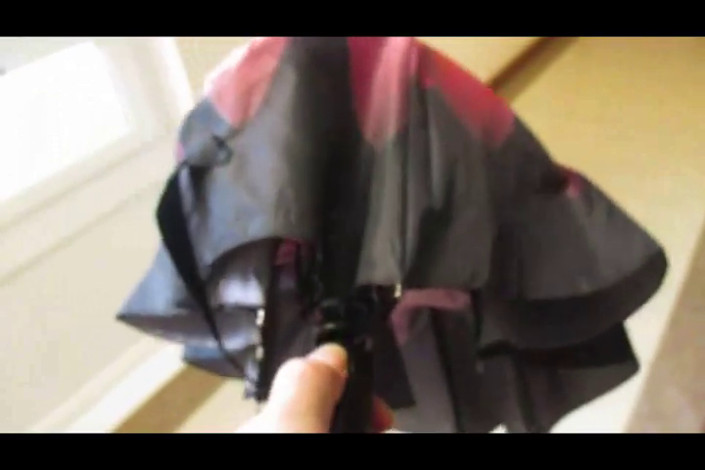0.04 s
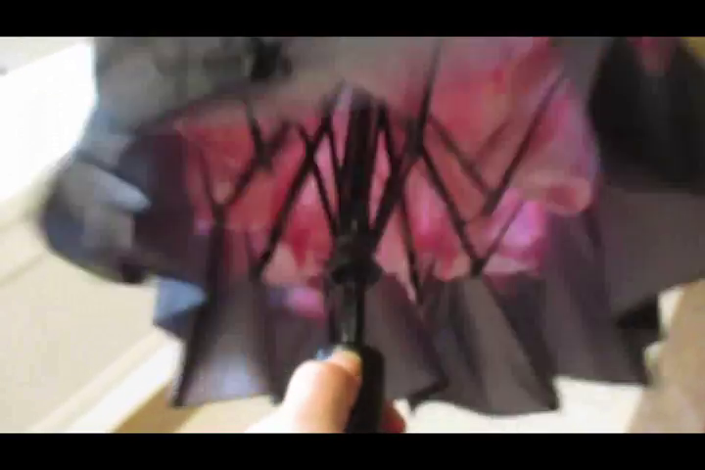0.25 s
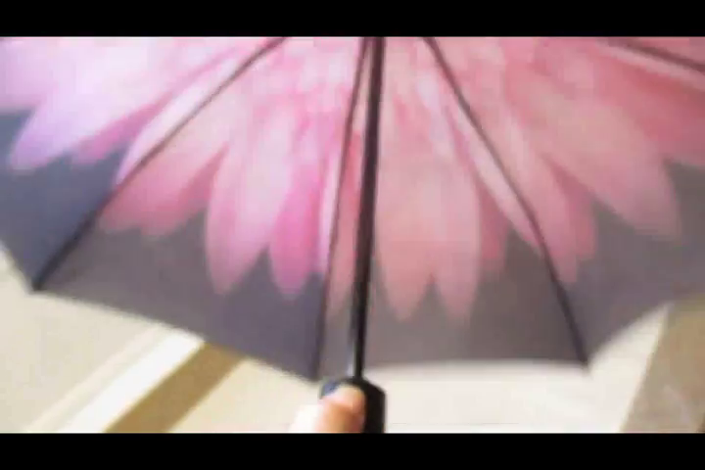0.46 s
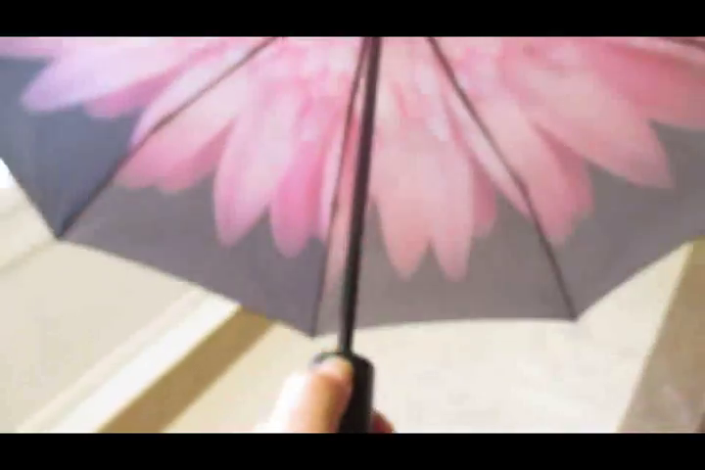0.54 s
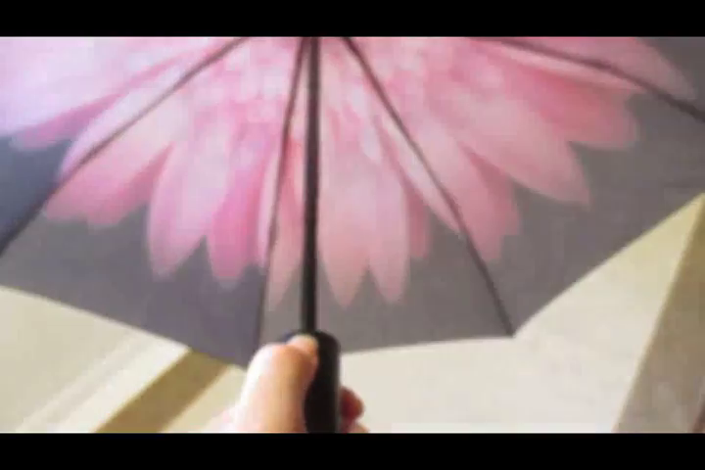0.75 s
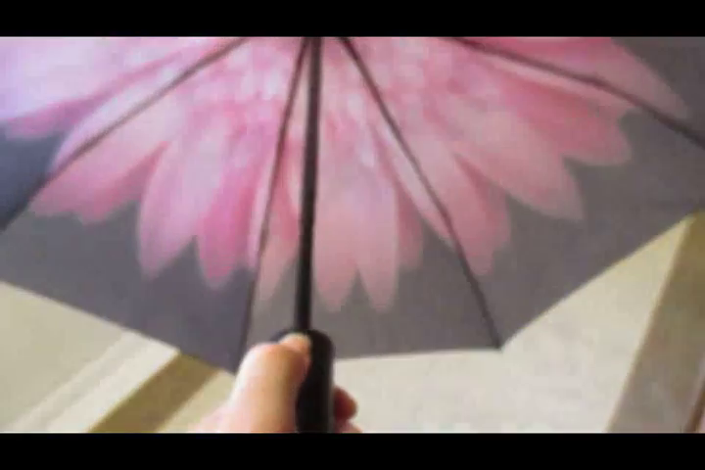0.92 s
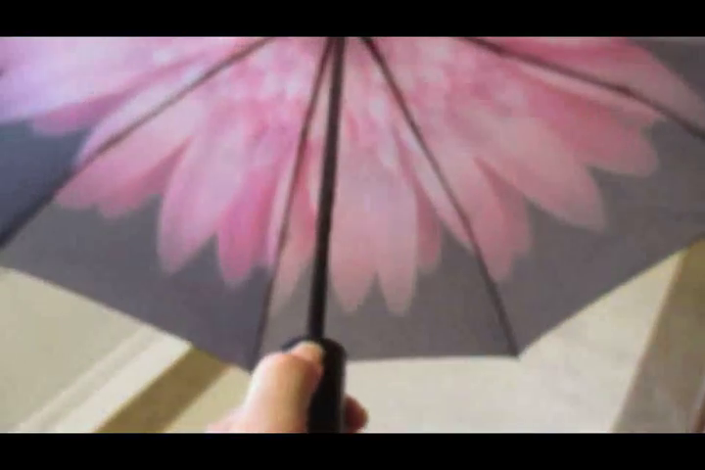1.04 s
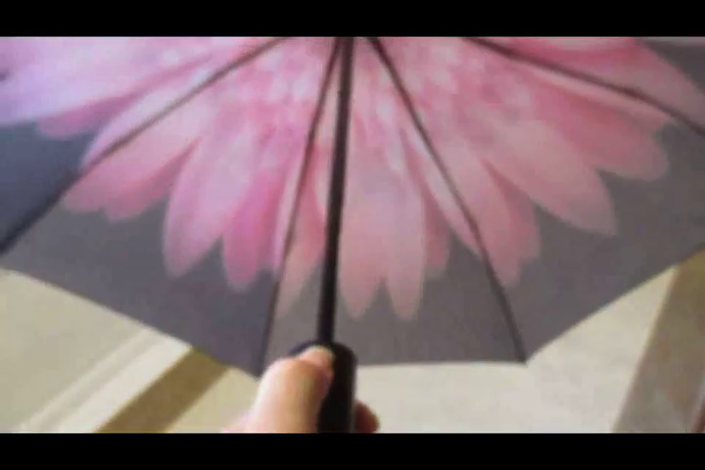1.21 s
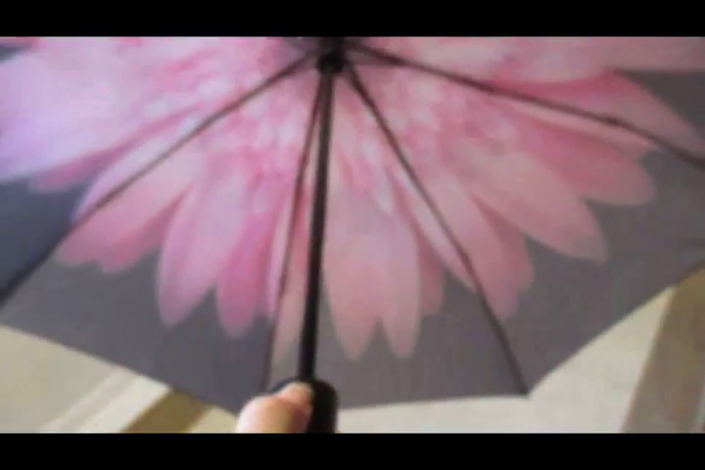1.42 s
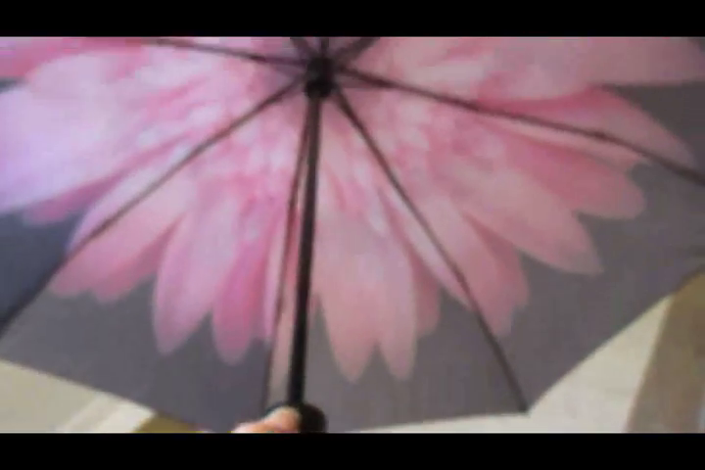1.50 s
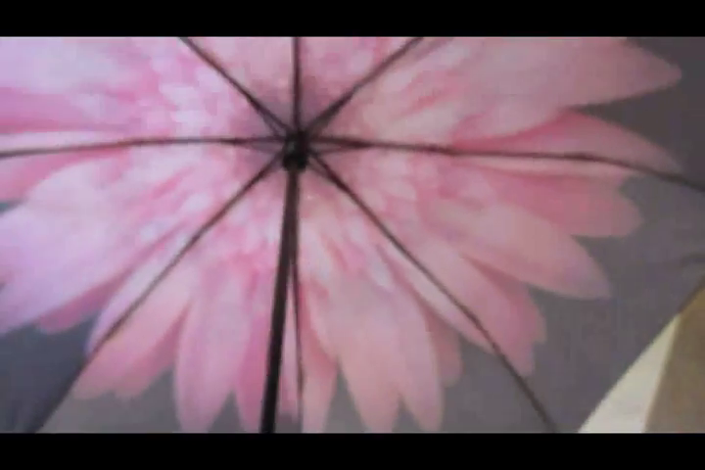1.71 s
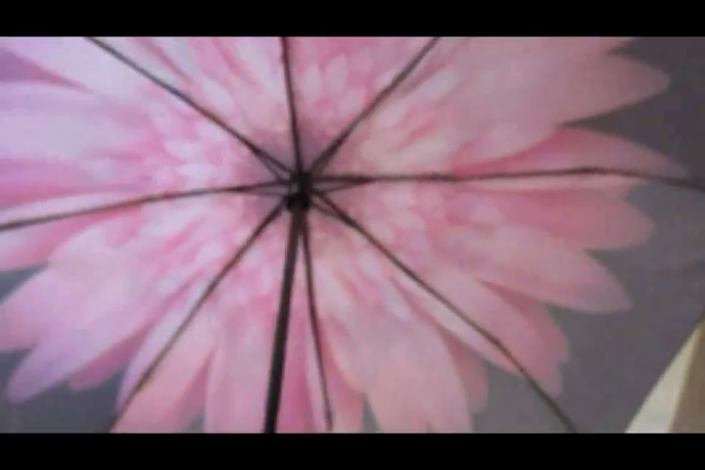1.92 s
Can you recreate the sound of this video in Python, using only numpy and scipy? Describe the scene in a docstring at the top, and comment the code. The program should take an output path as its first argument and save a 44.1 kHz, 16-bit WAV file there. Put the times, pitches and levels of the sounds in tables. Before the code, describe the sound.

A spring-loaded umbrella pops open indoors with a crack, whoosh, clack and deep cloth thump

```python
"""A spring-loaded umbrella opens in a small room, close to a hand-held camera.
First button ticks and the catch's crack: coloured noise bursts over dying shaft sines.
Then the runner slides, nylon swishes and flaps (shaped noise), and panels snap (low-passed bursts).
The runner hits its stop: a burst and short modes; the canopy thumps and hums on as dying sines.
Last, a faint rustle, a hand jolt and finger clicks on the camera's case, over room rumble and hum."""
import sys
import numpy as np
from scipy import signal
from scipy.fft import rfft, irfft
from scipy.io import wavfile
from scipy.ndimage import uniform_filter1d

SR = 44100
rng = np.random.default_rng(int(sys.argv[2]) if len(sys.argv) > 2 else 0)


def log_audio(samples):
    """Write samples as a 16-bit WAV file to the path given in sys.argv[1]."""
    # one column per channel
    frames = np.atleast_2d(samples).T
    # limit to full scale, then quantise
    limited = np.clip(frames, -1, 1)
    pcm = np.round(limited * 32767).astype(np.int16)
    wavfile.write(sys.argv[1], SR, pcm)


N = 85995
T = np.arange(N) / SR
STOP_S, STOP_LENGTH_S = 0.533, 0.0026


def amp(db):
    """Decibels to gain."""
    return 10 ** (np.asarray(db) / 20)


def unit_rms(x):
    """Scales to rms 1."""
    return x / np.sqrt(np.mean(x ** 2) + 1e-20)


def spectrum_at(points, hz):
    """Interpolates a (frequency, value) table on a log-frequency axis."""
    f, value = np.transpose(points)
    return np.interp(np.log(hz + 1), np.log(f + 1), value)


def level(points):
    """Gain over time from a (time, dB) curve."""
    return amp(np.interp(T, *np.transpose(points)))


def add(mix, start_s, sound):
    """Mixes a sound in at start_s, in place."""
    part = mix[round(start_s * SR):][:len(sound)]
    part += sound[:len(part)]


def coloured(x, points, size=8192):
    """Minimum-phase filter with the given (Hz, dB) spectrum."""
    gain_db = spectrum_at(points, abs(np.fft.fftfreq(size, 1 / SR)))
    log_gain = np.log(amp(gain_db))
    response = np.exp(np.conj(signal.hilbert(log_gain)))
    taps = np.fft.ifft(response).real[:size // 2]
    return signal.fftconvolve(x, taps)[:len(x)]


def cut(x, hz, kind, order=2):
    """Butterworth low-pass or high-pass."""
    sos = signal.butter(order, min(hz, SR / 2 - 1), kind, fs=SR, output="sos")
    return signal.sosfilt(sos, x)


def burst(length_s, size=4096, count=6):
    """Crunch of contacts: dying noise of energy 1, its spectrum repeatedly flattened."""
    fade = np.exp(-(T[:size] / length_s) ** 2 / 2)
    x = rng.standard_normal(size)
    for _ in range(count):
        phase = np.angle(rfft(x * fade))
        x = irfft(np.exp(1j * phase))
    x = x * np.sqrt(fade)
    return x / np.linalg.norm(x)


def ring(modes, rise_s=1e-5, scatter=0):
    """Exponentially dying sines; scatter 1 starts each at a random phase."""
    out = np.zeros(N)
    for hz, db, t60_s in modes:
        decay = np.exp(-np.log(1000) * T / t60_s)
        out += amp(db) * decay * np.sin(2 * np.pi * (hz * T + scatter * rng.random()))
    return out * (1 - np.exp(-T / rise_s))


# panels and ribs snapping out: (time [s], level [dB], length [s], low-pass [Hz])
SNAPS = [(.331, 8, 0.0011, 1500), (0.334, 18.5, 0.0012, 300), (0.35, 6.5, .0006, 1500),
         (0.377, 1.5, 0.0013, 3500), (.3801, 10, .0012, 7000), (.427, 21.5, .0002, 1400),
         (.4291, 11, .00008, 9000), (0.4205, 10, 0.0044, 3200), (0.43, 13.5, .002, 450),
         (0.466, 1, 0.00047, 3500), (.473, 1, 0.0023, 5000)]


def snaps():
    """Panels and rib joints jerk straight one after another: low-passed bursts."""
    out = np.zeros(N)
    for start_s, db, length_s, lowpass_hz in SNAPS:
        add(out, start_s, amp(db) * cut(burst(length_s), lowpass_hz, "low"))
    return out


# runner against its stop: (frequency [Hz], gain [dB])
STOP_COLOUR = [(100, 3), (400, 5), (750, 16.5), (1400, 18), (1800, 9.5), (2400, 15), (3600, 3), (4000, 19),
               (4350, 22.5), (4800, 17.5), (5150, 5.5), (5600, 15.5), (6200, 4), (6900, 10.5)]


def stop():
    """The runner clacks into its stop: one coloured burst."""
    out = np.zeros(N)
    add(out, STOP_S, coloured(burst(STOP_LENGTH_S), STOP_COLOUR))
    return out


# metal of the stop: (frequency [Hz], level [dB], t60 [s])
STOP_MODES = [(4300, 0.5, 0.004), (4560, -5.5, .0035)]
STOP_RING_RISE_S = 0.00055


def stop_ring():
    """The struck stop rings briefly in its metal modes."""
    out = np.zeros(N)
    add(out, STOP_S, ring(STOP_MODES, STOP_RING_RISE_S))
    return out


# canopy pulled taut: (frequency [Hz], level [dB], t60 [s])
THUMP_MODES = [(28.5, -23, .55), (55, -21.5, .09), (246, -8, 0.028), (290, -10, 0.029), (388, -14.5, 0.035),
               (720, -20.5, .01)]
THUMP_DELAY_S = 0.0021


def thump():
    """The canopy, pulled taut just after the stop, thumps like a drum skin."""
    out = np.zeros(N)
    add(out, STOP_S + THUMP_DELAY_S, ring(THUMP_MODES))
    return out


# taut canopy and ribs: (frequency [Hz], level [dB], t60 [s])
CANOPY_MODES = [(36.25, -36.5, 2.5), (57.5, -37, 1.8), (91.2, -28.5, 2.13), (117.4, -37.5, 2),
                (151.3, -31.5, 2.2), (210.3, -38, 1.8), (231, -33, 1.4), (282, -34.5, 1.03),
                (343, -45, 1.0), (368, -44.5, .7), (545, -48.5, 1.6)]
CANOPY_RISE_S = 0.02


def canopy():
    """The stretched cloth and ribs hum on in slowly dying modes."""
    out = np.zeros(N)
    add(out, STOP_S, ring(CANOPY_MODES, CANOPY_RISE_S, scatter=0.99))
    return out


# what the canopy throws into the room: (frequency [Hz], gain [dB])
BOOM_COLOUR = [(60, -3), (180, 8), (290, 21), (400, 21), (700, 14), (1200, 6.5), (2500, 1), (7000, -5)]


def boom():
    """The pop of the tightening canopy, a burst that feeds the room."""
    out = np.zeros(N)
    add(out, STOP_S, coloured(burst(STOP_LENGTH_S), BOOM_COLOUR))
    return out


# nylon and runner sliding: (time [s], level [dB])
SLIDE_LEVEL = [(0, -76), (.225, -62.5), (.238, -28.5), (.27, -34.5), (.305, -32), (.33, -28), (.37, -28),
               (.385, -23), (.405, -28.5), (.424, -24.5), (.44, -46), (.455, -49.5), (.472, -40.5),
               (.485, -37), (.51, -34.5), (.535, -34.5), (.56, -60.5), (.7, -96.5)]
# nylon hiss: (frequency [Hz], relative level [dB])
SLIDE_COLOUR = [(100, -25.5), (500, -9), (900, -4.5), (1700, -4.5), (2800, 2), (4500, 1.5), (6000, -2),
                (7200, -2.5)]
CRINKLES_PER_S, CRINKLE_SPREAD_DB = 4200, 3.5
CRINKLE_SHARE = 0.5  # of the power


def swish():
    """Nylon rubs on itself: steady hiss mixed with random crinkle impulses."""
    sizes = amp(CRINKLE_SPREAD_DB * np.minimum(rng.exponential(1, N), 4))
    struck = rng.random(N) < CRINKLES_PER_S / SR
    crinkles = sizes * rng.choice([-1, 1], N) * struck
    hiss = rng.standard_normal(N)
    rub = np.sqrt(CRINKLE_SHARE) * unit_rms(crinkles) + np.sqrt(1 - CRINKLE_SHARE) * hiss
    return level(SLIDE_LEVEL) * unit_rms(coloured(rub, SLIDE_COLOUR))


# cloth pushing the air: (time [s], level [dB])
BILLOW_LEVEL = [(.225, -74), (.24, -29.5), (.27, -36.5), (.318, -43), (.334, -30), (.345, -30), (.37, -27),
                (.395, -32.5), (.412, -21), (.434, -17.5), (.45, -28.5), (.47, -17), (.485, -29.5),
                (.52, -19.5), (.55, -30.5), (.62, -31), (.72, -44), (.9, -66)]
# flapping cloth: (frequency [Hz], slack relative level [dB], taut relative level [dB])
BILLOW_COLOUR = [(20, -9.5, 9.5), (44.85, 0, 2.5), (93, 2, 7), (150, -2, -7.5), (259.3, 6.5, 9),
                 (456, -4.5, -6), (784, 3.5, -6), (1400, -8.5, -26), (2540, -7.5, -27), (6000, -39, -47.5)]
TAUT_FROM_S, TAUT_TO_S = 0.4, 0.56


def billow():
    """Flapping cloth pushes air; its noise grows deeper as the canopy spreads."""
    colour = np.array(BILLOW_COLOUR)
    air = rng.standard_normal(N)
    slack = unit_rms(coloured(air, colour[:, [0, 1]]))
    taut = unit_rms(coloured(air, colour[:, [0, 2]]))
    spread = np.interp(T, [TAUT_FROM_S, TAUT_TO_S], [0, 1])
    return level(BILLOW_LEVEL) * ((1 - spread) * slack + spread * taut)


PATCHY_DB, PATCHY_S = 2, 0.0044  # standard deviation, smoothing window


def patchy():
    """Folds catch and slip: smoothed random gain of rms 1."""
    drift = uniform_filter1d(rng.standard_normal(N), int(PATCHY_S * SR))
    return unit_rms(amp(PATCHY_DB * unit_rms(drift)))


# button and catch: (time [s], level [dB], length [s], bass [dB], treble [dB])
CATCH_TICKS = [(0.1236, -28.5, 0.0017, -5.5, -1), (0.1475, -27, 0.0023, -9, -4),
               (0.1703, -12, .0012, -9, -10), (0.2245, -20.5, 0.012, -1.5, 0), (0.2364, 9, 0.0021, -1.5, 1)]
# burst of the catch: (frequency [Hz], gain [dB])
CATCH_COLOUR = [(30, 13.5), (90, 11.5), (300, 6), (700, 12.5), (1600, 3.5), (2050, 2.5), (2800, 7.5),
                (3600, 4), (4600, -0.5), (5500, 5.5), (7200, -2)]
# shaft: (frequency [Hz], level [dB], t60 [s]), before each tick's level and tone
SHAFT_MODES = [(46.4, -34.5, 0.12), (680, -40, 0.11), (973, -46.5, 0.033), (2480, -39, 0.082),
               (2725, -36, 0.027), (3500, -36, 0.027)]


def catch():
    """Ticks of the button, then the crack of the catch, each a burst that rings the shaft."""
    out = np.zeros(N)
    for start_s, db, length_s, bass_db, treble_db in CATCH_TICKS:
        tick = ring(SHAFT_MODES, scatter=1)
        add(tick, 0, coloured(burst(length_s), CATCH_COLOUR))
        tone = [(300, bass_db), (2600, 0.00035), (4000, treble_db)]
        add(out, start_s, amp(db) * coloured(tick, tone))
    return out


# finger clicks: (time [s], level [dB], ping [dB], knock [dB], hollow [dB], body [dB], edge [dB], top [dB])
CLICKS = [(1.3778, -10.5, -11.5, -3, -0.5, 3, 1, 2), (1.5605, -19, -6, 1, -1.5, -8.5, 1, 6.5),
          (1.569, -23, -3, -2.5, -3, -6.5, 9, -1.5), (1.668, -6.5, -2.5, 2.5, 5.5, -1, -3, 4),
          (1.6767, -24, -19.5, -4, -6.5, 4, 4, 9.5), (1.7945, 0, 2, 1, 2, 0.5, -5.5, 2.5),
          (1.8015, -11.5, -20.5, -2.5, -3, 2.5, 10.5, 6)]
# zones of the case, knock to top: (frequency [Hz])
CASE_ZONES_HZ = [940, 1900, 3150, 4330, 6000]
# case, before each click's level and zone gains: (frequency [Hz], level [dB], t60 [s])
CASE_MODES = [(724, -23.5, .027), (856, -27, 0.016), (990, -22.5, 0.023), (1604, -29.5, 0.017),
              (1894, -27.5, 0.015), (2825, -28.5, 0.032), (3070, -16.5, 0.012), (3270, -38, 0.0097),
              (4600, -33.5, 0.015), (5850, -36.5, 0.036), (6080, -34, .014), (6860, -42.5, 0.012)]
# dry contact tick: (frequency [Hz], gain [dB])
CLICK_COLOUR = [(700, 3.5), (1100, 6), (1400, -8.5), (1900, -0.5), (2300, -2.5), (3100, 5), (4300, -3.5),
                (5300, -17), (6000, 3.5), (6700, -15.5), (7200, -9.5)]
# loose metal part, before click and ping levels: (frequency [Hz], level [dB], t60 [s])
PING_MODES = [(3810, -27.5, 0.048), (4200, -29, 0.045)]
# small spring singing on, before click level: (frequency [Hz], level [dB], t60 [s])
SPRING_MODES = [(995, -52.5, 1.2)]
CLICK_TICK_DB, CLICK_TICK_S = -0.5, 0.0066
CHATTER_DB, CHATTER_S = -9.5, 0.004
CASE_RISE_S, CASE_HIGHPASS_HZ = 0.00056, 640


def case():
    """Gritty plastic clicks: modes, chattering parts and a tick, coloured by spot, plus small metal parts."""
    out = np.zeros(N)
    for start_s, db, ping_db, *zones_db in CLICKS:
        click = ring(CASE_MODES, CASE_RISE_S, scatter=0.94)
        click += amp(CHATTER_DB) * signal.fftconvolve(click, burst(CHATTER_S))[:N]
        add(click, 0, amp(CLICK_TICK_DB) * coloured(burst(CLICK_TICK_S), CLICK_COLOUR))
        plastic = coloured(click, list(zip(CASE_ZONES_HZ, zones_db)))
        metal = amp(ping_db) * ring(PING_MODES, CASE_RISE_S) + ring(SPRING_MODES)
        add(out, start_s, amp(db) * (plastic + metal))
    return cut(out, CASE_HIGHPASS_HZ, "high", order=4)


# jolts through the hand: (time [s], level [dB])
JOLTS = [(0.334, -25.5), (1.24, -40.5)]
# one jolt, before its level: (frequency [Hz], level [dB], t60 [s])
JOLT_MODES = [(45, 5.5, 0.093), (85, -2, 0.17)]


def jolts():
    """Jolts of the hand: short low modes."""
    out = np.zeros(N)
    for start_s, db in JOLTS:
        add(out, start_s, amp(db) * ring(JOLT_MODES, rise_s=0.002))
    return out


EARLY_DB, EARLY_S = -11, 0.0054


def reflections(hits):
    """Close reflections under the canopy: the hits smeared by a short noise burst."""
    return amp(EARLY_DB) * signal.fftconvolve(hits, burst(EARLY_S))[:N]


# decay of the room: (frequency [Hz], t60 [s])
ROOM_T60 = [(100, .6), (300, .6), (1000, 0.5), (3000, 0.45), (7000, 0.4)]
ROOM_RISE_S = 0.014


def room(x, size=256):
    """Diffuse tail: noise that builds up softly, each band dying at its own speed."""
    hz, t, bands = signal.stft(rng.standard_normal(SR), SR, nperseg=size)
    t60_s = spectrum_at(ROOM_T60, hz)[:, None]
    tail = signal.istft(bands * np.exp(-np.log(1000) * t / t60_s), SR, nperseg=size)[1]
    tail *= 1 - np.exp(-(T[:len(tail)] / ROOM_RISE_S) ** 2)
    return signal.fftconvolve(x, tail / np.linalg.norm(tail))[:N]


def steady_noise(colour):
    """Coloured noise of rms 1, past its filter's onset."""
    return unit_rms(coloured(rng.standard_normal(N + SR), colour)[SR:])


# held cloth: (time [s], level [dB])
RUSTLE_LEVEL = [(0, -65.5), (.2, -58.5), (.4, -77.5), (.94, -80), (.99, -63.5), (1.06, -64.5),
                (1.12, -82.5), (1.95, -77.5)]
# held cloth: (frequency [Hz], relative level [dB])
RUSTLE_COLOUR = [(100, -10.5), (800, 2), (2500, 3), (5000, -7), (7200, -1)]


def rustle():
    """Faint rustle of the held cloth: coloured noise under a level curve."""
    return level(RUSTLE_LEVEL) * steady_noise(RUSTLE_COLOUR)


# room rumble: (frequency [Hz], relative level [dB])
RUMBLE_COLOUR = [(12, -32), (20, 5.5), (115, -4.5), (293, -14.5), (480, -18.5), (556, -19.5), (932, -20.5),
                 (1000, -21), (1280, -28), (1420, -26.5), (1730, -29), (2260, -31), (7200, -38),
                 (9360, -67), (15800, -120)]
# room rumble: (time [s], level [dB])
RUMBLE_LEVEL = [(0, -44), (.22, -45), (.3, -49), (.85, -52.5), (1.3, -52), (1.6, -50.5), (1.95, -48)]


def rumble():
    """Room rumble: coloured noise, quieter after the crack of the catch."""
    return level(RUMBLE_LEVEL) * steady_noise(RUMBLE_COLOUR)


# room hum, before its drop: (frequency [Hz], level [dB])
HUM_TONES = [(89, -52), (118, -50), (205, -58), (557, -60.5)]
HUM_DROP_DB = -10


def hum():
    """Steady sines that drop after the crack of the catch."""
    tones = sum(amp(db) * np.sin(2 * np.pi * (hz * T + rng.random())) for hz, db in HUM_TONES)
    return tones * level([(0.22, 0.0049), (0.3, HUM_DROP_DB)])


ROOM_HITS_DB, ROOM_CLOTH_DB = -18.5, -7


def scene():
    """Umbrella, its close reflections, camera case, hand and room."""
    opening = catch() + snaps()
    cloth = (swish() + billow()) * patchy()
    hits = opening + stop()
    umbrella = hits + reflections(hits) + stop_ring() + thump() + cloth + canopy()
    tail = room(amp(ROOM_HITS_DB) * opening + amp(ROOM_CLOTH_DB) * cloth + boom())
    background = rustle() + rumble() + hum()
    return (umbrella + case() + jolts() + tail + background)[None]


EDGE_HZ, CLIP_LEVEL = 7270, 0.86


def record(dry):
    """Band limit, overload of the loudest peaks, band limit again."""
    band = signal.firwin(901, EDGE_HZ, window=("kaiser", 7), fs=SR)[None]
    held = np.clip(signal.oaconvolve(dry, band, "same"), -CLIP_LEVEL, CLIP_LEVEL)
    return signal.oaconvolve(held, band, "same")


dry = scene()
out = record(dry)
log_audio(out)
```